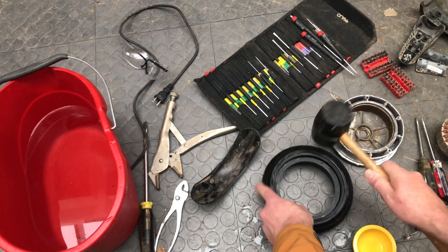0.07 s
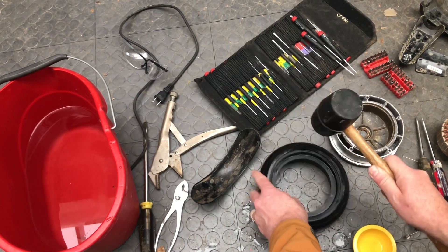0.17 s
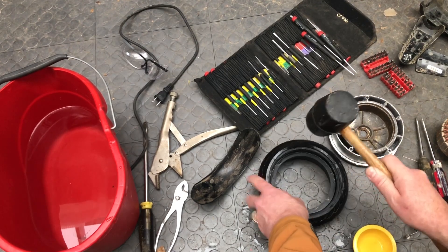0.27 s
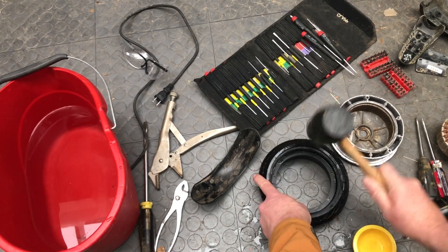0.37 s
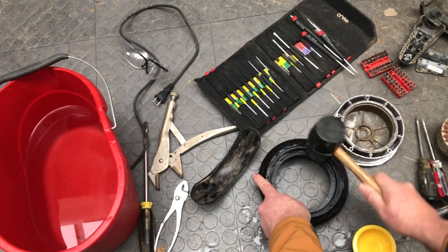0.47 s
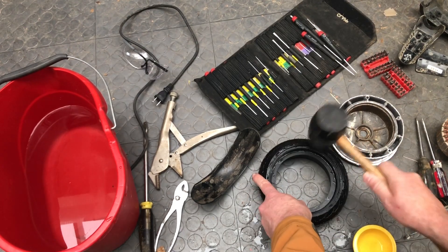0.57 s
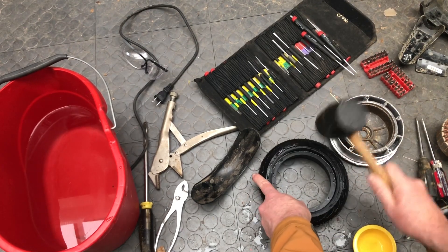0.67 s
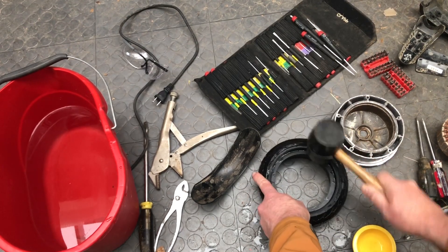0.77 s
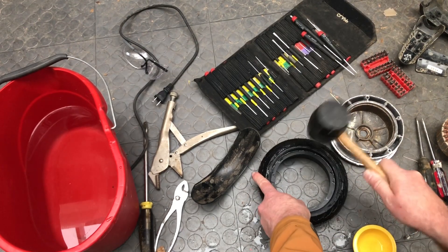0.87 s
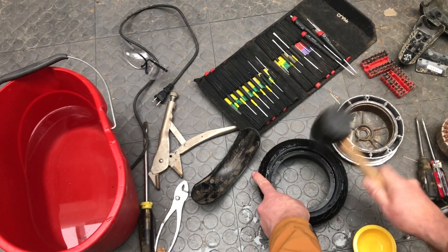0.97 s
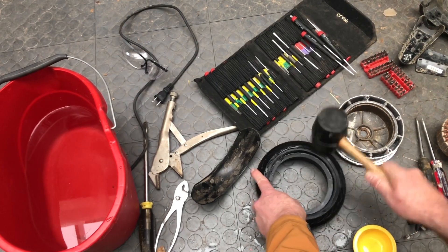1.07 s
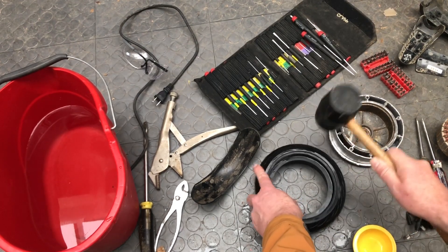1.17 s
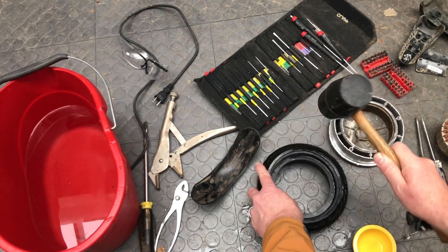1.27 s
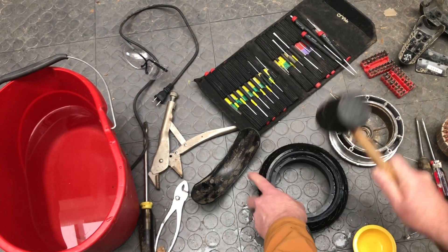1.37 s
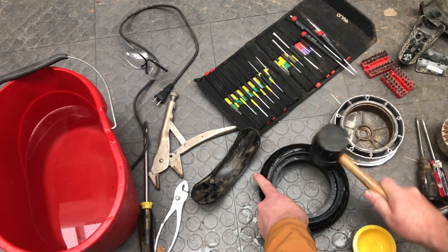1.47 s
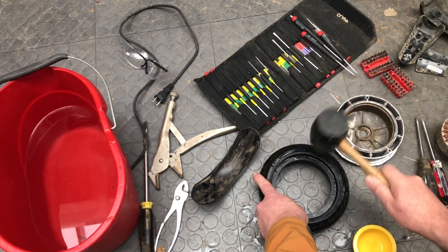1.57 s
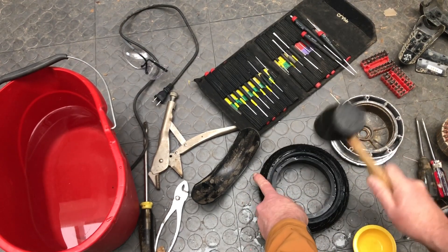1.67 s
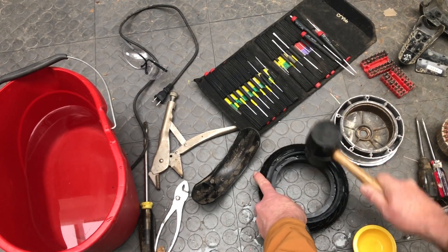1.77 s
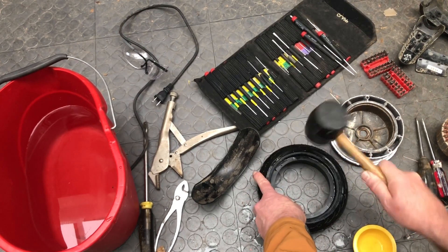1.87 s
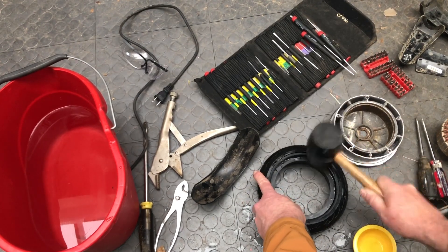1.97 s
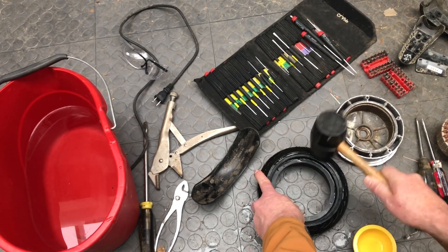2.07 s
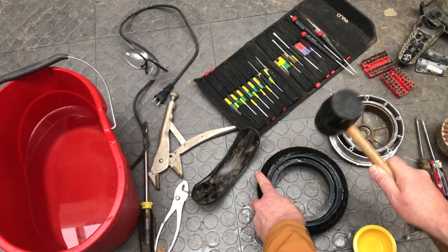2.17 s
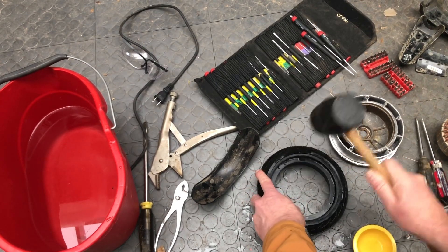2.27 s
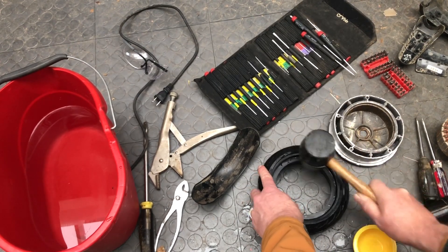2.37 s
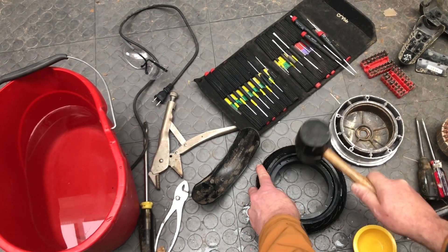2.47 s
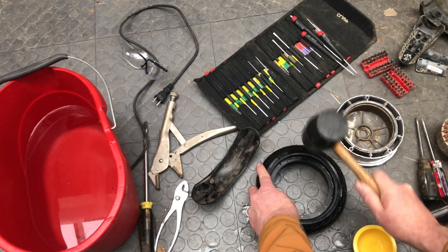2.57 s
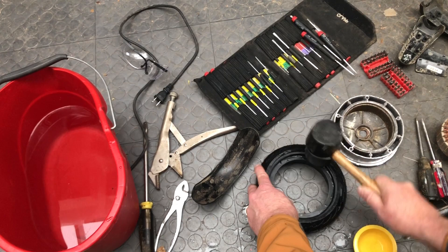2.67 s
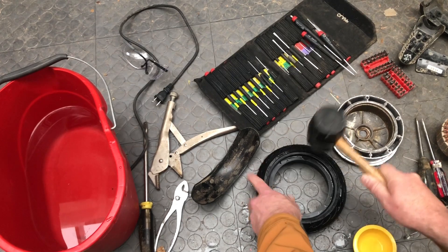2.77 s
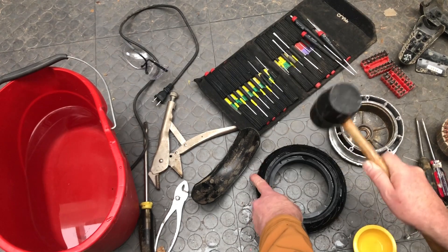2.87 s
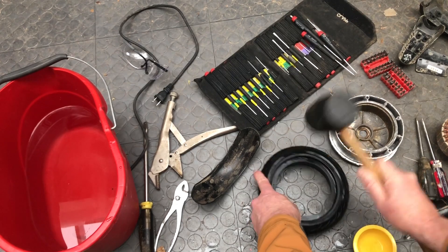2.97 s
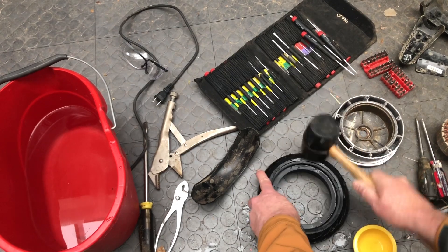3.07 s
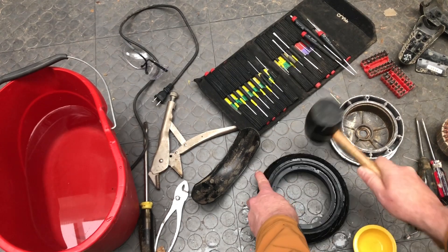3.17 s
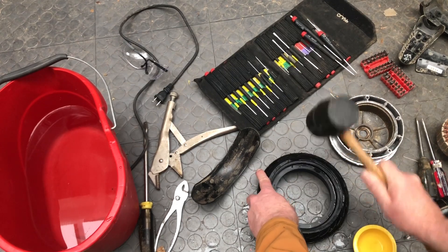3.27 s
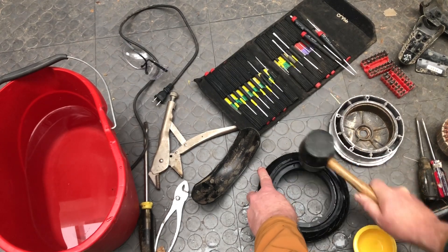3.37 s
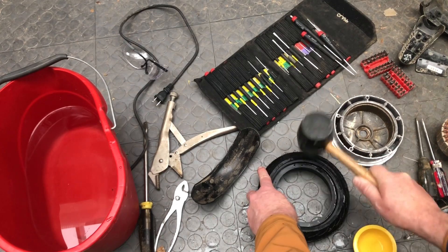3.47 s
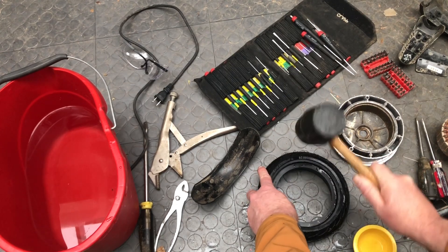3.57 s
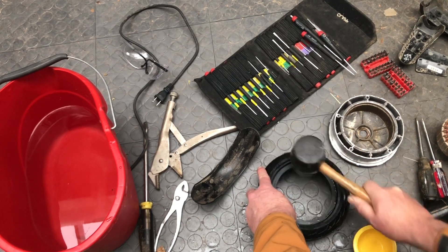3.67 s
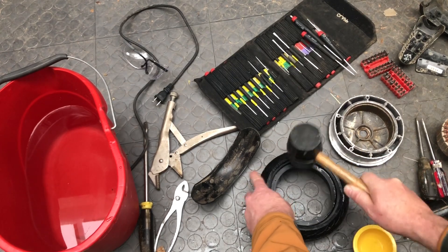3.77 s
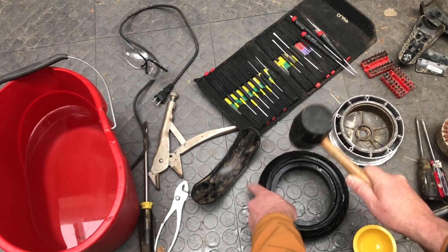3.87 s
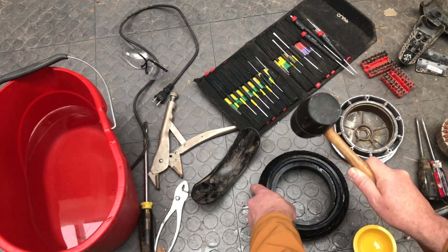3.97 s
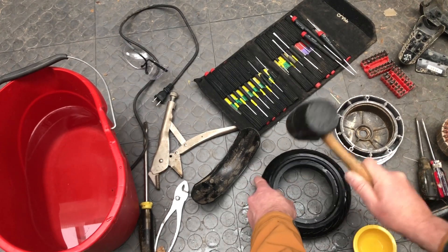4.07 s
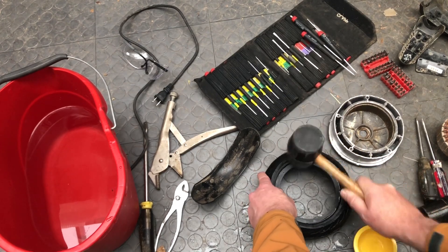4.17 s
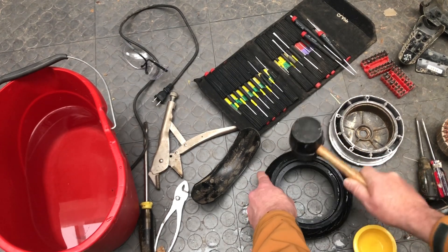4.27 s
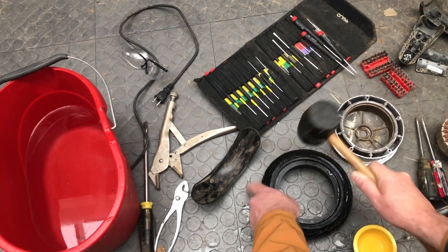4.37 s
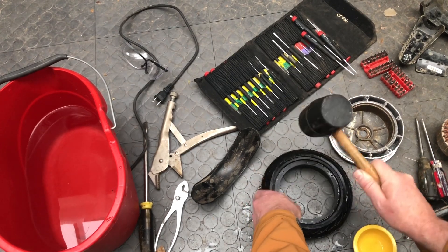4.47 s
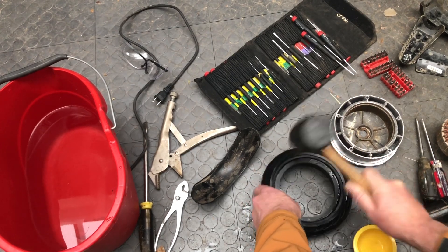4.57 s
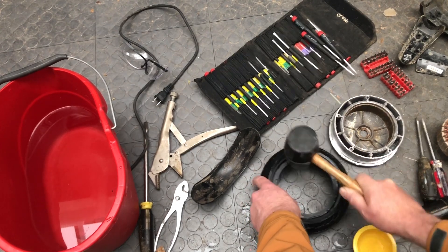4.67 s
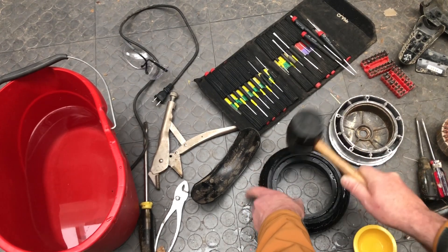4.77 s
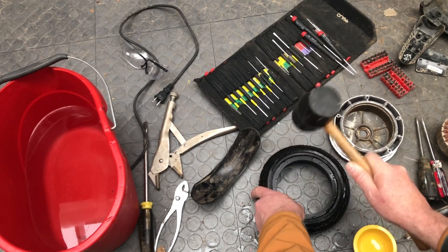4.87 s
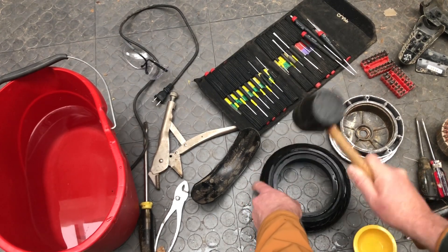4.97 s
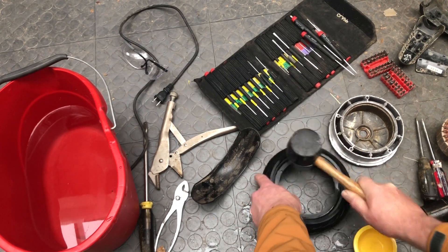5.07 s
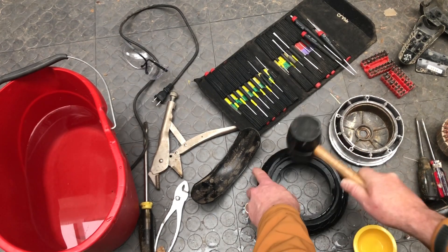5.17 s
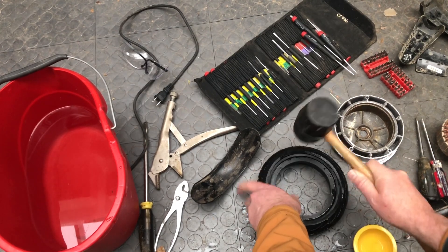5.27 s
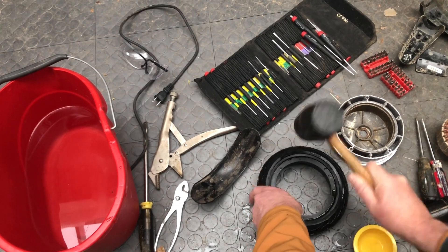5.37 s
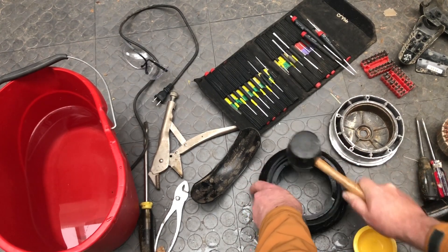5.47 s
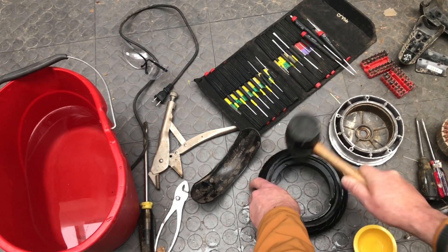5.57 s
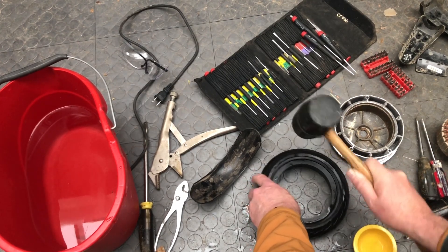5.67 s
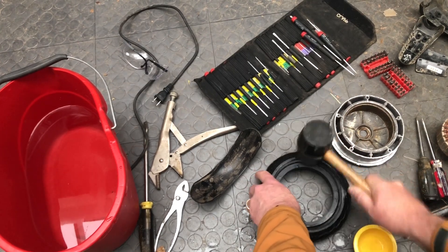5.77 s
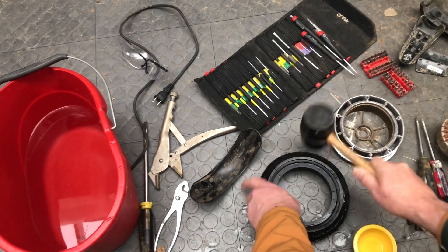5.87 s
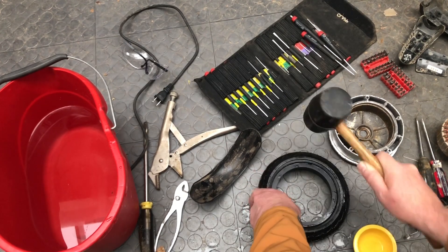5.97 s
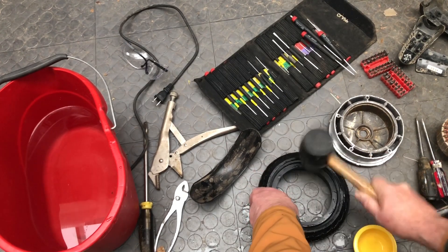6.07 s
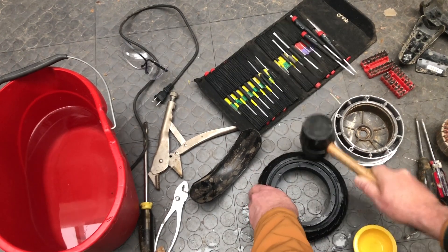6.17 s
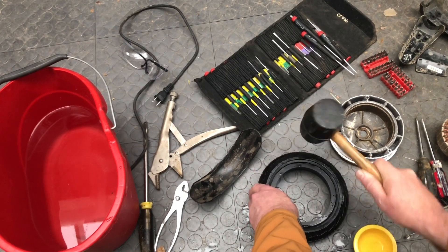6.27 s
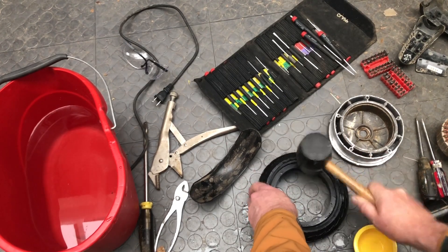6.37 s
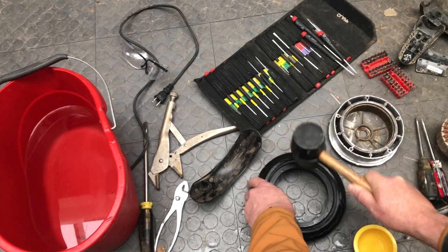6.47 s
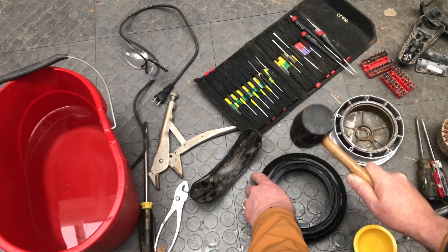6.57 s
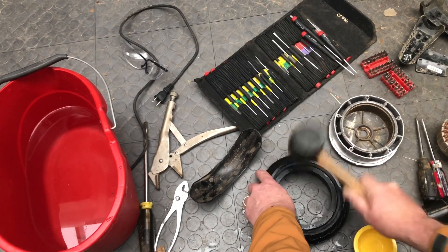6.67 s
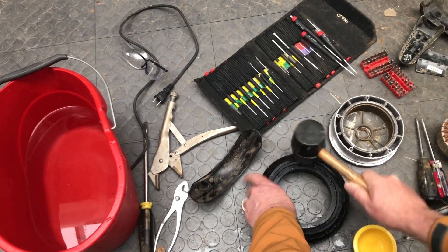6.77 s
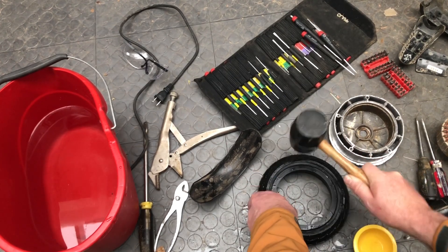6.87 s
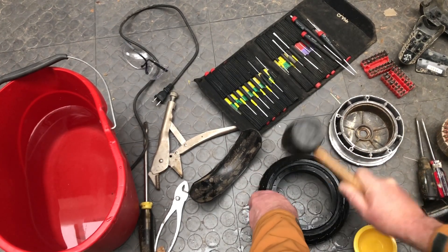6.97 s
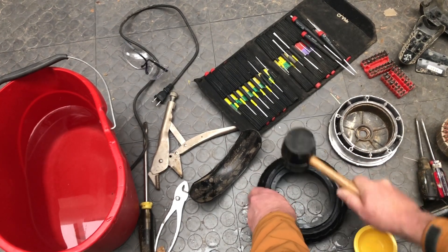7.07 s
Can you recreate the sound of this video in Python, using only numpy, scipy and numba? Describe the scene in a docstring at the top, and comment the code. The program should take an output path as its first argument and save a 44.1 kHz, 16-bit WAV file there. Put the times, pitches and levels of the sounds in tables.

```python
"""A hard workshop still rings from a mallet blow as a hand drags a small wet tyre round on the floor.
Then the rubber mallet taps on, about three blows a second: each a wet slap and a hollow, falling pop.
Right after each hit the tyre bottoms out, hops, lands and settles while the room answers loudly;
now and then the mallet drops back on it. Between some blows the hand drags it on, hissing and ticking.
Throughout, a phone close above ducks the hits with its limiter."""
import sys
import numpy as np
from scipy import signal
from scipy.fft import rfft, irfft
from scipy.io import wavfile
from scipy.ndimage import uniform_filter1d, minimum_filter1d
from numba import njit

SR = 44100
rng = np.random.default_rng(int(sys.argv[2]) if len(sys.argv) > 2 else 0)


def wav_record(signal):
    """Record a signal, one row per channel, as 16-bit PCM in the file named by sys.argv[1]."""
    frames = np.transpose(np.atleast_2d(signal))
    bounded = np.clip(frames, -1, 1)
    # unit amplitude maps onto the largest positive 16-bit level
    quanta = np.round(bounded * 32767).astype(np.int16)
    wavfile.write(sys.argv[1], SR, quanta)


N = 313551

# mallet blows and the tyre's hop after each:
# (time [s], strength [dB], wet slap [dB], slap edge [dB], hop [s], landing knock [dB], landing clack [dB])
BLOWS = [(0.446, -4.5, -2.5, 2.5, 0.031, -16, -13), (0.7489, 0.5, 7, 5, 0.026, -14.5, -14),
         (1.0234, 1.5, 7.5, 8.5, 0.044, -15, -4.5), (1.4657, -1.5, -6, -13, .045, -16.5, -7.5),
         (1.7503, -0.9, -1.5, -2, 0.033, -17.5, -10), (1.9986, -6, -11.5, -3, 0.019, -18, -17.5),
         (2.3811, -2, -4, -8, 0.032, -18.5, -14), (2.6415, -3, -7.5, 0, 0.029, -18.5, -12),
         (3.052, -1.5, -2, 3, 0.034, -15, -11.5), (3.3778, -1.5, 0.5, 3, .0402, -19, -6.5),
         (3.6699, 0, 1.5, 5.5, 0.04, -13.5, -5.5), (4.1832, -3, 0.5, -4.5, 0.035, -23.5, -10.5),
         (4.636, 0.5, 0, -4.5, 0.048, -5.5, 1), (5.0814, -1.5, -2, 1, .0201, -15, -13.5),
         (5.4646, 3, -0.5, -3.5, 0.036, -9.5, -1.5), (5.7782, 0.7, 1, 3, 0.04, -19, -1),
         (6.1047, 1.5, 3, 16.5, 0.045, -16.5, 3.5), (6.3983, 0.5, 2, 8, 0.041, -7.5, 4.5),
         (6.714, 2, 3.5, 1, 0.04, -20.5, -15), (7.0416, -4.5, 2.5, -4, 0.04, -25, -13)]
# the hand drags the tyre round: (start [s], length [s], starting level [dB])
DRAGS = [(0.058, .28, -32.5), (1.19, 0.16, -36.5), (2.256, 0.16, -43.5), (2.935, 0.15, -33),
         (3.972, 0.34, -40.5), (4.519, .17, -35), (4.913, 0.26, -37), (5.408, 0.11, -35),
         (5.65, 0.18, -38.5), (6.578, .17, -40)]
# ring of the tyre and its jig on the floor: (frequency [Hz], relative level [dB], t60 [s])
TYRE_MODES = [(58.7, -43, 0.53), (114.7, -33.5, 0.26), (140.8, -38, 0.53), (176.3, -33, 0.21),
              (241.4, -32, 0.14), (301, -32.5, 0.11), (325.3, -21.5, 0.23), (353.2, -21.5, 0.21),
              (467, -19, 0.29), (523.3, -23, 0.26), (606, -26, 0.075), (705, -29, 0.39), (757, -25.5, 0.32),
              (842, -29.5, 0.1)]
# midrange body of the wet slap: (frequency [Hz], relative level [dB])
SLAP = [(200, -7.5), (700, 3), (1100, -3.5), (1450, 0), (1900, 2), (2300, 3.5), (2700, -12), (2920, -3.5),
        (3200, -15.5), (4000, -29), (4500, -26.5), (5200, -44), (9000, -49)]
# bright fizz of the splash, with the phone's own narrow peaks near 7 and 12 kHz:
# (frequency [Hz], relative level [dB])
FIZZ = [(2000, -0.5), (4300, -17.5), (5100, -21.5), (6200, -6.5), (6950, 6), (8200, -17.5), (10000, -25.5),
        (11700, -31.5), (12300, -18), (13200, -25.5), (15500, -17)]

BOTTOM_S = .02335  # from a blow until the squashed tyre bottoms out


def mallet(walls, touch_s=0.001297, echo_change=0.87):
    """The hits with their reverb: the same walls, but echoes that change as tyre and arms move."""
    out, t = np.zeros(N), seconds(.1)
    for s, pop_db, slap_db, edge_db, *_ in BLOWS:
        hit = blow(s, pop_db, slap_db, edge_db)
        room = np.sqrt(1 - echo_change) * walls + np.sqrt(echo_change) * room_response()
        add(out, s, hit)
        add(out, s, signal.fftconvolve(hit, room))
        add(out, s, amp(pop_db - 22.5) * thump(t))
        # the water's sharpest crack beams straight up, so it stays dry
        add(out, s, amp(slap_db - 0.5) * splat(t, FIZZ, length_s=0.0002987))
        # the mallet meets the water film just before the rubber
        touch = amp(-17) * splat(t, FIZZ, length_s=0.00037) + amp(10) * splat(t, SLAP, length_s=0.0017)
        add(out, s - touch_s, amp(slap_db) * touch)
    # open on the reverb tail of a blow a moment earlier
    add(out, -.1, signal.fftconvolve(blow(0, pop_db=0, slap_db=1, edge_db=-2), walls))
    return out


def blow(s, pop_db, slap_db, edge_db):
    """One hit: slap and splash for attack, a pop and a lower knock for body, tyre and steel for tail."""
    # steel parts on the floor, set ringing by the slap: (frequency [Hz], relative level [dB], t60 [s])
    steel_modes = [(2910, -37, 0.28), (2770, -35.5, 0.2), (2910, -29, 0.35), (2830, -46, 0.31),
                   (2272, -45, .3), (1926, -42, .3), (4470, -57, 0.4)]
    t = seconds(.6)
    hz = 735.5 + 9.5 * pop_db - 19.6 * s  # higher when hit harder, sinking as the work goes round
    body = amp(18.5) * pop(t, hz, rise_s=0.0015, decay_s=0.0018)
    body += amp(6.5) * pop(t, 0.48 * hz, rise_s=0.0018, decay_s=0.0022)
    ring_db = 4.5 + 0.31 * pop_db  # the rubber's ring grows more slowly than the blow
    tyre = amp(ring_db) * ring(t, TYRE_MODES, detune=0.0194, scatter_db=3, swell_s=0.0059)
    steel = amp(edge_db / 2 - 13.5) * ring(t, steel_modes, detune=0.00082, scatter_db=0.5, swell_s=0.0056)
    slap = amp(14) * splat(t, SLAP, length_s=0.000607, edge_db=edge_db)
    splash = amp(3.5) * splat(t, FIZZ, length_s=0.00094)
    return amp(pop_db) * body + tyre + amp(slap_db) * (slap + steel + splash)


def pop(t, hz, rise_s, decay_s, bend=0.9, glide_s=0.0012):
    """Air squeezed from under the rubber: a few cycles that dive past hz as the tyre gives."""
    pitch = hz * (0.88 + bend * np.exp(-t / glide_s))
    envelope = (1 - np.exp(-(t / rise_s) ** 2)) * np.exp(-t / decay_s)
    return envelope * np.sin(2 * np.pi * np.cumsum(pitch) / SR)


def splat(t, points, length_s, edge_db=0, edge_hz=2720, size=4096, band_bins=24):
    """The water film bursts in a brief crackle, each band at its own moment; edge brightens it."""
    bins = np.arange(size // 2 + 1)
    hz = bins * SR / size
    delay = np.interp(bins / band_bins, bins, length_s * rng.gamma(2, 1, len(bins)))
    phase = -2 * np.pi * np.cumsum(delay) * SR / size
    tilt = amp(edge_db / 2 * np.tanh(2 * np.log2((hz + 1) / edge_hz)))
    burst = irfft(tilt * np.exp(1j * phase))[:size // 2]
    return colour(np.pad(burst, (0, len(t) - len(burst))), points)


def ring(t, modes, detune, scatter_db, swell_s):
    """Modes bloom and fade; each strike point weights and detunes them a little."""
    tones = np.zeros(len(t))
    for hz, db, t60 in modes:
        gain = amp(db + scatter_db * rng.standard_normal())
        pitch = hz * (1 + detune * rng.standard_normal())
        tones += gain * np.sin(2 * np.pi * pitch * t) * np.exp(-np.log(1000) * t / t60)
    return tones * (1 - np.exp(-(t / swell_s) ** 2))


def thump(t, hz=106):
    """The low end: one slow swing as the squashed tyre bottoms out on the floor."""
    press = np.exp(-((t - BOTTOM_S) / .008) ** 2)
    return np.sin(2 * np.pi * hz * (t - BOTTOM_S)) * press


def bounces(touch_s=0.001283):
    """The tyre bottoms out, hops, lands with a clack and settles; sometimes the mallet drops back."""
    # the mallet drops back on the tyre: (time [s], knock [dB], nominal pitch [Hz])
    mallet_drops = [(0.0279, -23.5, 377), (2.0664, -24.5, 330), (2.4708, -24.5, 350), (2.7303, -22, 380),
                    (3.4766, -27, 393), (3.7813, -20, 500), (5.5563, -24.5, 507), (6.5215, -27.5, 387),
                    (6.8288, -11, 416)]
    out = np.zeros(N)
    for s, pop_db, _, _, hop_s, knock_db, clack_db in BLOWS:
        lands = s + hop_s
        add(out, lands - touch_s, clack(clack_db))
        bottoming = (s + BOTTOM_S, pop_db - 25.5)
        settling = (lands + .48 * hop_s, knock_db - 15.5)  # one more hop, shorter and weaker
        for when, db in [bottoming, (lands, knock_db), settling]:
            hz = (468 + db) * (1 + 0.1 * rng.standard_normal())  # harder is a touch higher
            add(out, when, rebound(db, hz))
    for s, knock_db, hz in mallet_drops:
        add(out, s - touch_s, clack(knock_db + 5.5))
        add(out, s, rebound(knock_db, hz))
    return out


def rebound(knock_db, hz):
    """A softer, lower knock of the same rubber, whose pitch drops steeply as it settles."""
    t = seconds(.4)
    knock = amp(24.5) * pop(t, hz, rise_s=0.0012, decay_s=0.002, bend=1.12)
    tyre = amp(2) * ring(t, TYRE_MODES, detune=0.0303, scatter_db=5.5, swell_s=0.0034)
    return amp(knock_db) * (knock + tyre)


def clack(clack_db):
    """Wet rubber claps together again: the bright transient just ahead of a knock."""
    t = seconds(.1)
    clap = amp(-8) * pop(t, 1858, rise_s=0.00061, decay_s=0.0018, bend=0.2)
    slap = amp(15) * splat(t, SLAP, length_s=0.0007095)
    splash = splat(t, FIZZ, length_s=0.0023)
    return amp(clack_db) * (clap + slap + splash)


def drags(fade_s=0.069, swell_db_per_s=5.5, uneven_db=2, slips_per_s=900):
    """Rubber sticks and slips on the mat in dense little jerks, which hiss and set the tyre humming."""
    # low scrape of the drag, with a thin 7 kHz hiss coloured by the microphone:
    # (frequency [Hz], relative level [dB])
    drag_eq = [(60, -55.5), (170, -11.5), (320, 8), (520, -2.5), (780, -0.5), (1200, -16.5), (2300, -14),
               (3500, -29), (5200, -44), (6300, -35.5), (7050, -17.5), (8000, -41), (11000, -52),
               (12500, -41), (15000, -40)]
    t, force = np.arange(N) / SR, np.zeros(N)
    for start, length, db in DRAGS:
        swell_db = swell_db_per_s * np.clip(t - start, 0, length)  # the tyre gathers speed
        fade = np.clip(np.minimum(t - start, start + length - t) / fade_s, 0, 1)
        force += amp(db + swell_db) * fade
    wobble = unit(uniform_filter1d(rng.standard_normal(N), 900))
    force *= amp(uneven_db * wobble)
    slips = (rng.random(N) < slips_per_s / SR) * rng.standard_normal(N)
    jerks = unit(unit(slips) + rng.standard_normal(N))
    tyre = ring(seconds(.5), TYRE_MODES, detune=.005, scatter_db=1, swell_s=.002)
    hum = signal.fftconvolve(force * jerks, tyre / np.linalg.norm(tyre))[:N]
    return force * colour(jerks, drag_eq) + amp(-7) * hum


def ticks(faint_per_s=16):
    """Wet rubber lets go of the mat: a few clear ticks, and faint ones sprinkled through every drag."""
    # the louder ticks of rubber unsticking: (time [s], level [dB])
    clear_ticks = [(1.147, -10), (1.297, -27), (1.557, -24), (2.294, -25.5), (2.929, -25), (2.989, -15)]
    out, t = np.zeros(N), seconds(.1)
    faint_ticks = [(start + length * rng.random(), db + 4 + 1.5 * rng.standard_normal())
                   for start, length, db in DRAGS for _ in range(round(faint_per_s * length))]
    for s, db in clear_ticks + faint_ticks:
        add(out, s, amp(db) * splat(t, FIZZ, length_s=0.00033))
    return out


def room_response(predelay_s=0.011, build_s=0.0013, near_db=-11, bands=12):
    """Nearby things scatter a little at once; then the walls answer, each band dying at its own rate."""
    # the workshop's reverb: (frequency [Hz], relative level [dB], t60 [s])
    reverb = [(60, -11.5, 0.19), (153, -4.5, 0.62), (289.5, 0, 0.21), (579, -13.5, 0.4), (1095, -2, 0.41),
              (2056, -2, 0.46), (2965, 4.5, 0.36), (4560, 3.5, 0.77), (6160, -10, 0.2), (14900, -7, 0.3)]
    t = seconds(.8)
    late = np.maximum(t - predelay_s, 0)
    hz = np.arange(len(t) + 1) * SR / (2 * len(t))
    centres = np.geomspace(60, 15000, bands)
    band_position = np.interp(np.log(hz + 1), np.log(centres), np.arange(bands))
    noise, tail = rfft(rng.standard_normal(2 * len(t))), np.zeros(len(t))
    for k, t60 in enumerate(on_log_axis(centres, reverb, column=2)):
        band = irfft(noise * np.maximum(1 - np.abs(band_position - k), 0))[:len(t)]
        tail += band * np.exp(-np.log(1000) * late / t60)
    # a cluttered room is diffuse: no narrow band stands out from its broad colour
    spectrum = rfft(tail, 2 * len(t))
    even = spectrum / np.sqrt(uniform_filter1d(np.abs(spectrum) ** 2, 90))
    swell = np.maximum(amp(near_db), 1 - np.exp(-late / build_s))
    return amp(2) * swell * irfft(even * amp(on_log_axis(hz, reverb)))[:len(t)]


def room_tone(level_db=-49):
    """The workshop's quiet air: a steady bed of noise."""
    # colour of the background noise: (frequency [Hz], relative level [dB])
    air_spectrum = [(25, -28.5), (60, -15), (140, -5), (350, 0), (800, -13.5), (1400, -11), (2500, -7),
                    (4000, -27), (5300, -40.5), (7000, -26.5), (10000, -44.5), (15000, -36)]
    return amp(level_db) * unit(colour(rng.standard_normal(N), air_spectrum))


def amp(db):
    """Decibels to gain."""
    return 10 ** (np.asarray(db) / 20)


def unit(x):
    """Scale to rms 1."""
    return x / np.sqrt(np.mean(x ** 2))


def seconds(length):
    """A time axis."""
    return np.arange(int(length * SR)) / SR


def add(track, s, sound):
    """Mix a sound into a track at time s."""
    i = int(round(s * SR))
    part = sound[max(-i, 0):max(N - i, 0)]
    track[max(i, 0):max(i, 0) + len(part)] += part


def on_log_axis(hz, points, column=1):
    """Read one column of a spectrum table along log frequency."""
    points = np.array(points)
    return np.interp(np.log(hz + 1), np.log(points[:, 0]), points[:, column])


def colour(x, points, size=2048):
    """Minimum-phase EQ with the given curve and unit energy."""
    hz = np.arange(size // 2 + 1) * SR / size
    cepstrum = irfft(np.log(amp(on_log_axis(hz, points))))
    cepstrum[1:size // 2] *= 2
    cepstrum[size // 2 + 1:] = 0
    response = irfft(np.exp(rfft(cepstrum)))
    return signal.fftconvolve(x, response / np.linalg.norm(response))[:len(x)]


def limit(x, ceiling, release_s, window):
    """Hold the peaks under the ceiling, looking half a window ahead."""
    needed = minimum_filter1d(np.minimum(1, ceiling / (np.abs(x) + 1e-9)), window)
    return x * uniform_filter1d(recover(needed, 1 / (release_s * SR)), window)


@njit
def recover(gain, step):
    """Gain drops at once and creeps back."""
    out, held = np.empty(len(gain)), 1.
    for i in range(len(gain)):
        held = min(gain[i], held + (1 - held) * step)
        out[i] = held
    return out


def scene():
    """The mix: blows, bounces and drags in the hard workshop, over its room tone."""
    walls, air = room_response(), room_tone()
    blows, dragging, knocks = mallet(walls), drags(), bounces() + ticks()
    reverb_send = amp(-3.5) * knocks + amp(-5) * dragging
    echoes = signal.fftconvolve(reverb_send, walls)[:N]
    return (blows + dragging + knocks + echoes + air)[None]


def record(dry, low_cut_hz=46, high_cut_hz=15800):
    """The phone cuts the bass, ducks the hits, squashes remaining peaks cycle by cycle and cuts the top."""
    x = signal.sosfilt(signal.butter(3, low_cut_hz, "high", fs=SR, output="sos"), dry[0])
    x = limit(x, ceiling=amp(0.5), release_s=0.016, window=15)
    x = limit(x, ceiling=.92, release_s=.0005, window=11)
    return signal.sosfilt(signal.ellip(8, .2, 70, high_cut_hz, fs=SR, output="sos"), x)[None]


dry = scene()
out = record(dry)
wav_record(out)
```